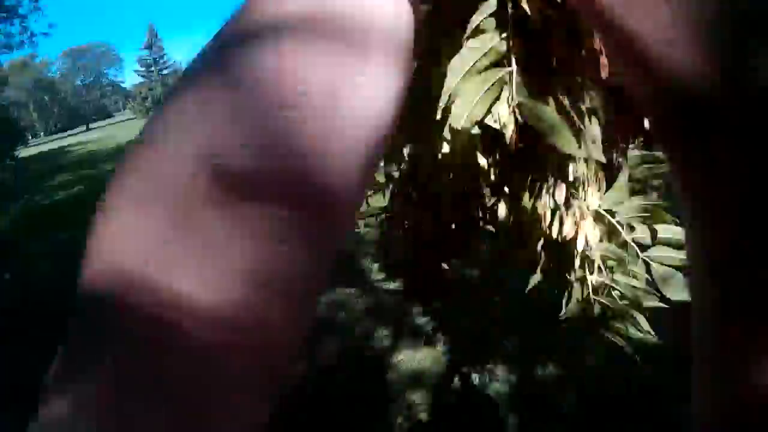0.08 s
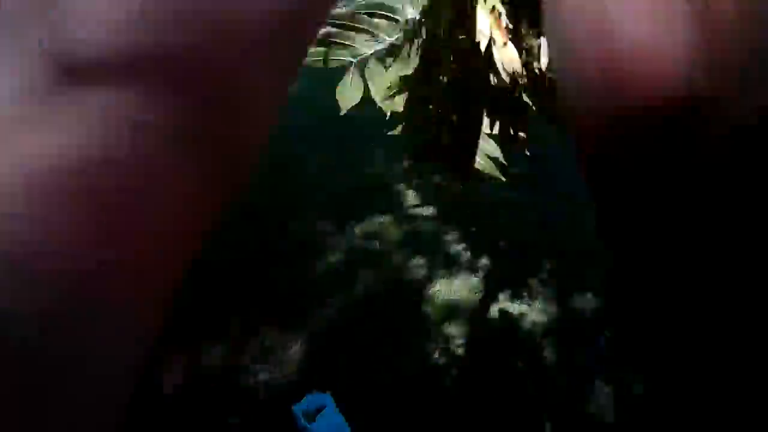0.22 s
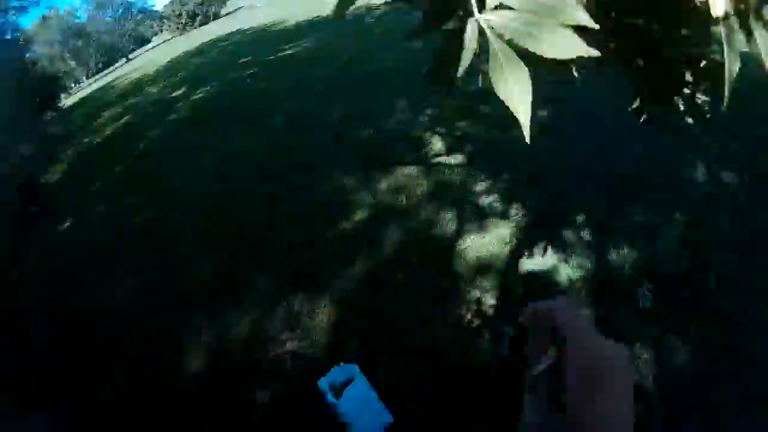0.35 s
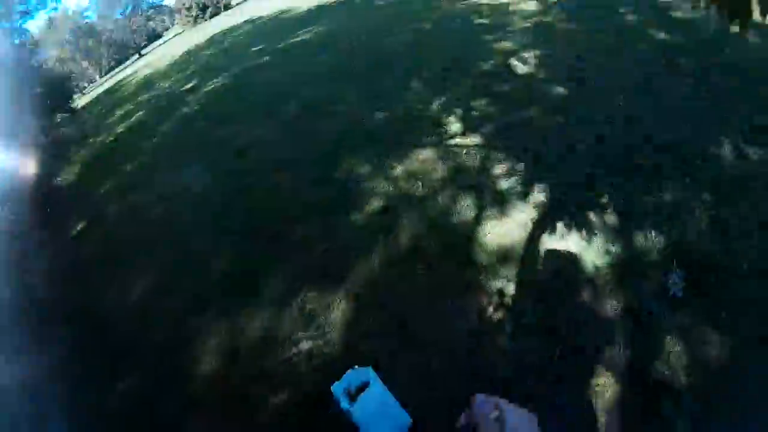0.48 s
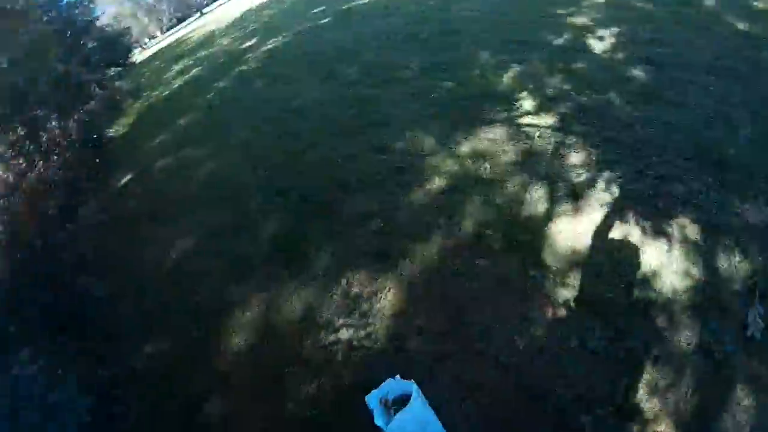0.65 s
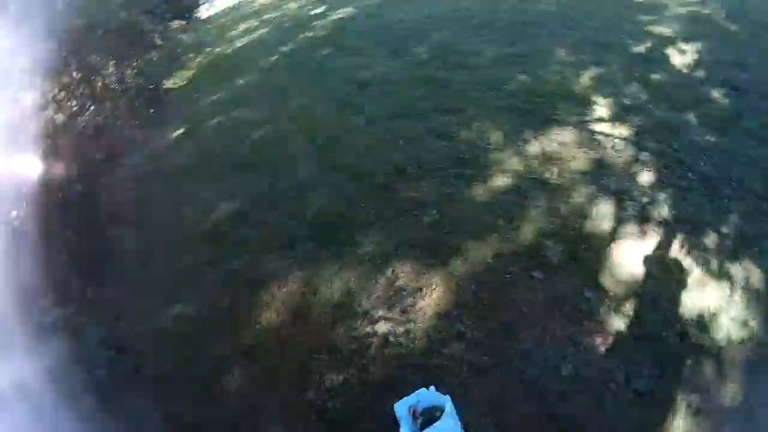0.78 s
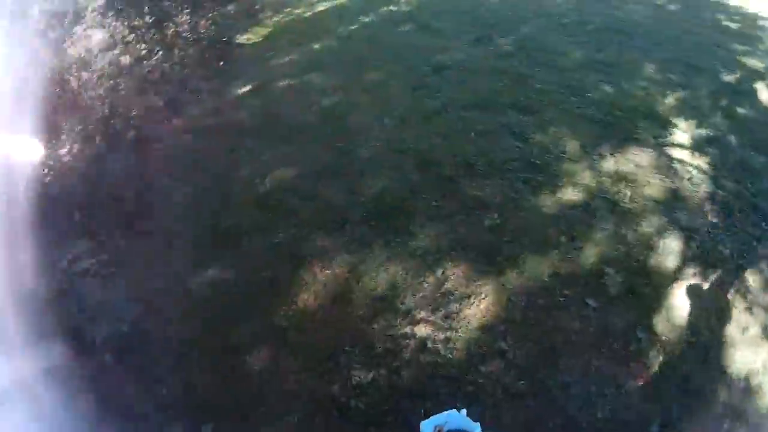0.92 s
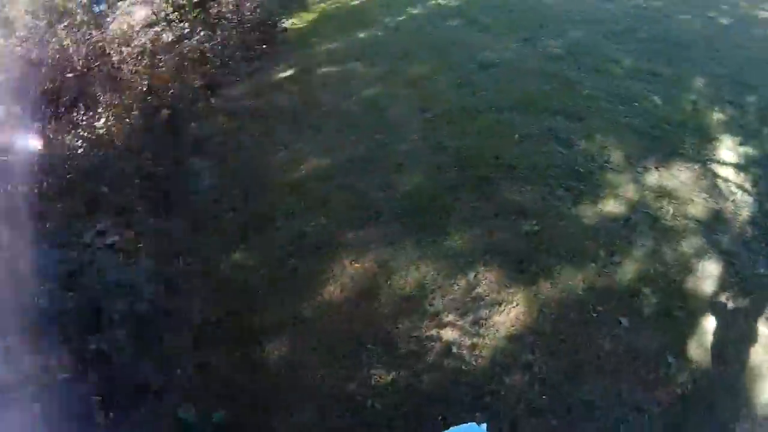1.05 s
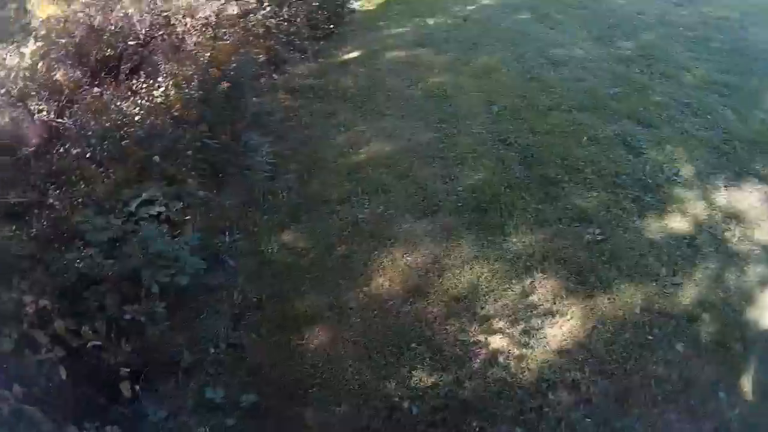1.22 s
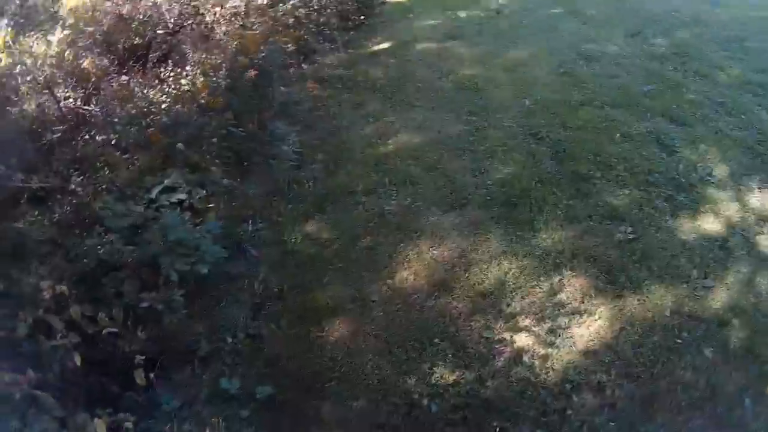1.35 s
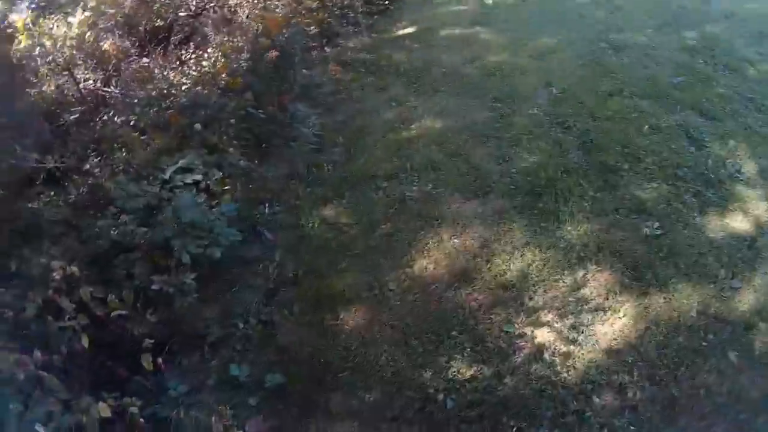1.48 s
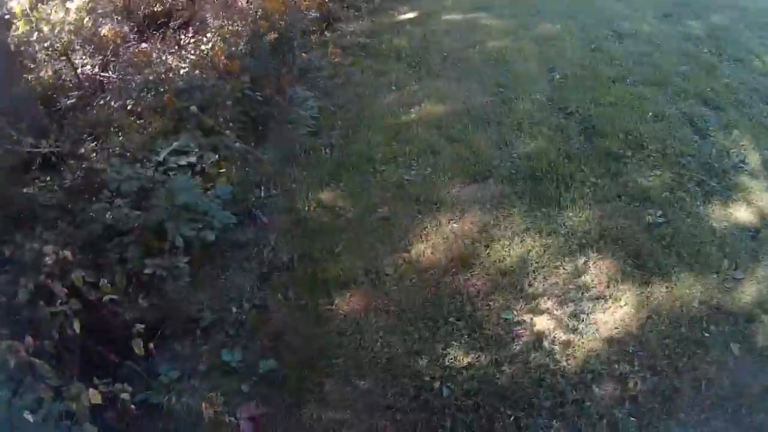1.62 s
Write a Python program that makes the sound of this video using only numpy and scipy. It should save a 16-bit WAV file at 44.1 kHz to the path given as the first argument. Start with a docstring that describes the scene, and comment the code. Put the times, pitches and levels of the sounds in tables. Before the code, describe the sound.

A hand releases a small plastic camera: one loud sharp snap with a short dull thump, heard from inside the case. Barely audible bumps come before and after, over faint outdoor air rumble and hiss.

```python
"""Outdoors, at no distance: the built-in microphone of a small plastic-cased camera hears its own case.
From the start: low air rumble and hiss (shaped noise), a faint whine (sines), a sway and latch ticks (ringing
modes), then two soft bumps. At 0.2 s the hand lets go: the latch ticks, the case is pushed and snaps back with a
thump (pressure steps, body modes, rattle), and sways. The treble hiss swells (noise humps) around 0.3 s, two
softer bumps follow at 0.52 s, and the hiss swells again around 1.2 s."""
import sys
import numpy as np
from scipy import signal
from scipy.fft import rfft, irfft
from scipy.io import wavfile
from scipy.ndimage import uniform_filter1d

SR = 44100
rng = np.random.default_rng(int(sys.argv[2]) if len(sys.argv) > 2 else 0)


def to_wav(sig):
    """Store sig (one row per channel, or 1-D mono) as 16-bit WAV at the path in sys.argv[1].

    Samples outside -1..1 are clipped; the rate is SR.
    """
    pcm = np.clip(np.atleast_2d(sig), -1, 1) * 32767
    pcm = np.round(pcm).astype(np.int16)
    wavfile.write(sys.argv[1], SR, pcm.T)  # frames by channels


def invert_db(x):
    """Field ratio 10**(x/20) for x, a level in decibels (scalar or array-like)."""
    u = np.asarray(x, float) / 20
    return 10 ** u


N = 74970  # samples, 1.7 s

# Colour of the air noise at the microphone. Each row: frequency in Hz, relative density in dB.
AIR_COLOUR = [(12, -24), (22, -5.5), (45, -3), (100, -5.5), (220, -6), (500, -11.5), (1000, -17),
              (2000, -22), (4000, -26.5), (8000, -28), (14500, -29)]
# Thin tones of the electronics. Each row: frequency in Hz, rms level in dB.
WHINE_TONES = [(6799, -93), (13593, -100)]
# The whole camera sways on its mount. Each row: start in seconds, frequency in Hz, level in dB, T60 in seconds.
MOUNT_SWAYS = [(.0001, 34.3, -48.5, 0.16), (0.215, 70.6, -51, .06), (.226, 111, -47, 0.052)]
# Ticks of the latch on the case. Each row: time in seconds, click level in dB before the shell rings.
LATCH_TICKS = [(.0021, -56), (.0029, -57), (.0034, -50.5), (.20205, -33), (.2023, -34), (.2026, -32.5),
               (.2031, -33.5), (.2036, -43)]
# Stiff shell modes rung by a tick. Each row: frequency in Hz, gain in dB, T60 in seconds.
SHELL_MODES = [(700, -15, 0.017), (1750, -7.5, 0.0099), (2186, -9.5, 0.017), (1924, -24.5, 0.077),
               (2045, -25, .1), (2615, -13.5, 0.011), (3110, -0.5, 0.0033), (4000, -13.5, 0.0046),
               (4330, -9, 0.0084), (5040, -9, 0.0054), (5600, -24, 0.0022), (8200, -17.5, 0.002),
               (9480, -9, 0.0017), (10660, -10, 0.0031), (10830, -16, 0.007), (13300, -28, 0.0026)]
# Pushes on the case that build up and let go. Each row: release in seconds, level in dB before the leak,
# direction (1 or -1), build-up time constant in seconds, duration of letting go in seconds.
CASE_PUSHES = [(.0062, -48.5, 1, 0.0034, 0.00067), (0.0529, -40.5, 1, 0.0013, 0.0012),
               (0.2058, -13, 1, 0.00087, 0.00059), (0.2075, -26.5, -1, 0.00021, 0.00035),
               (.5210, -45.5, 1, 0.0031, 0.00053), (0.5237, -44, -1, 0.0018, 0.0011)]
# Body modes rung when a push lets go. Each row: frequency in Hz, gain in dB, T60 in seconds.
BODY_MODES = [(189, -10.5, 0.042), (367, -13.5, 0.017), (650, -29, 0.023), (1027, -25.5, 0.061),
              (1206, -36, 0.015), (1334, -18, 0.042), (1500, -36, .02), (1805, -31, 0.024),
              (2065, -20, 0.016)]
# Swells of the treble hiss. Each row: centre in seconds, length in seconds, level in dB before the top is rounded.
HISS_SWELLS = [(0.292, .12, -74), (1.229, 0.086, -73.5)]


def level(x, db):
    """Scale to an rms level in dB."""
    return x * invert_db(db) / np.sqrt(np.mean(x ** 2))


def ring(x, modes):
    """Sum of damped sines excited by x, each a one-pole complex resonator."""
    out = np.zeros(N)
    for hz, db, t60 in modes:
        pole = np.exp((2j * np.pi * hz - np.log(1000) / t60) / SR)
        out += invert_db(db) * signal.lfilter([1], [1, -pole], x).imag
    return out


def band(low_hz, high_hz):
    """Unit-rms noise between two frequencies."""
    sos = signal.butter(2, (low_hz, high_hz), "band", fs=SR, output="sos")
    return level(signal.sosfilt(sos, rng.standard_normal(N)), 0)


def impulses(rows):
    """Clicks at (seconds, dB), each a sinc cut off 8 samples either side, to fall between samples."""
    out = np.zeros(N)
    for s, db in rows:
        offset = np.arange(N) - s * SR
        out += invert_db(db) * np.sinc(offset) * (abs(offset) < 8)
    return out


def air():
    """Coloured air noise; small gusts make its low part flutter."""
    air_db, gust_db = -66.5, 1.5  # rms of the whole; rms of the flutter
    gust_s, gust_hz = 1 / 66, 556  # averaging time of the flutter; it fades out above this frequency
    hz = np.fft.rfftfreq(N, 1 / SR) + 1  # 1 Hz up, so the log is finite
    table_hz, table_db = np.transpose(AIR_COLOUR)
    colour = invert_db(np.interp(np.log(hz), np.log(table_hz), table_db))
    noise = rfft(rng.standard_normal(N)) * colour
    low_share = 1 / (1 + (hz / gust_hz) ** 2)
    low = irfft(noise * low_share, N)
    high = irfft(noise * (1 - low_share), N)
    window = int(SR * gust_s)
    gust = uniform_filter1d(uniform_filter1d(rng.standard_normal(N), window), window)
    flutter = invert_db(gust_db * level(gust, 0))
    return level(low * flutter + high, air_db)


def whine():
    """Thin tones of the electronics on one shared clock that wavers a little."""
    waver = .00015  # rms share of the pitch
    drift = level(uniform_filter1d(rng.standard_normal(N), SR // 10), 0)
    clock = np.cumsum(1 + waver * drift) / SR  # seconds
    return sum(np.sqrt(2) * invert_db(db) * np.sin(2 * np.pi * hz * clock) for hz, db in WHINE_TONES)


def sway():
    """The camera on its mount swings as damped low modes, each set off once."""
    return sum(ring(impulses([(s, db)]), [(hz, 0, t60)]) for s, hz, db, t60 in MOUNT_SWAYS)


def latch():
    """Ticks pull the shell inward, hence the minus, and ring its modes."""
    return -ring(impulses(LATCH_TICKS), SHELL_MODES)


def bumps(t):
    """Pressure builds, lets go along a half cosine, leaks away and rings the body until the fingers grip it."""
    vent_hz, vent_q, direct_db = 176, 1.01, -1  # the push leaks out of the microphone chamber
    # harder pushes throw the fingers off for longer; then their grip damps the ring
    free_s_per_db, held_db, grip_t60_s = .00015, -55, .01
    rattle_db, rattle_rise_s, rattle_t60_s = -32.5, .001, .015
    rattle = band(1920, 6000)
    vent = 2 * np.pi * vent_hz
    high_pass = signal.bilinear([1, 0, 0], [1, vent / vent_q, vent ** 2], SR)
    out = np.zeros(N)
    for release, db, direction, build_s, let_go_s in CASE_PUSHES:
        u = t - release + let_go_s / 2  # seconds since letting go began
        before, after = np.minimum(u, 0), np.maximum(u, 0)
        let_go = (1 + np.cos(np.pi * np.clip(u / let_go_s, 0, 1))) / 2
        push = direction * np.exp(before / build_s) * let_go
        pressure = invert_db(direct_db) * signal.lfilter(*high_pass, push)
        free_s = free_s_per_db * (db - held_db)
        grip = np.exp(-np.log(1000) * np.maximum(u - free_s, 0) / grip_t60_s)
        body = grip * ring(np.gradient(push), BODY_MODES)
        buzz = np.exp(before / rattle_rise_s - np.log(1000) * after / rattle_t60_s)
        out += invert_db(db) * (pressure + body + invert_db(rattle_db) * buzz * rattle)
    return out


def hiss_swells(t):
    """Preamp hiss swells in the treble: noise under soft humps."""
    steepness = 1.9  # higher gives steeper flanks and a flatter top
    humps = np.zeros(N)
    for centre, length, db in HISS_SWELLS:
        arch = np.cos(np.pi * np.clip((t - centre) / length, -.5, .5))
        humps += invert_db(db) * np.tanh(steepness * arch)
    return humps * band(3470, 14500)


def scene():
    """All sources at the one built-in microphone."""
    t = np.arange(N) / SR
    mix = air() + whine() + sway() + latch() + bumps(t) + hiss_swells(t)
    return mix[None]


def low_pass(x):
    """Removes everything above the highest recorded frequency."""
    return signal.sosfilt(signal.butter(12, 14830, fs=SR, output="sos"), x)


def record(dry):
    """The recorder cuts the top steeply above 13.5 kHz."""
    top_cut = signal.cheby1(8, .3, 13500, fs=SR, output="sos")  # order 8, 0.3 dB ripple
    finished = signal.sosfilt(top_cut, dry)
    return low_pass(finished)


dry = scene()
out = record(dry)
to_wav(out)
```